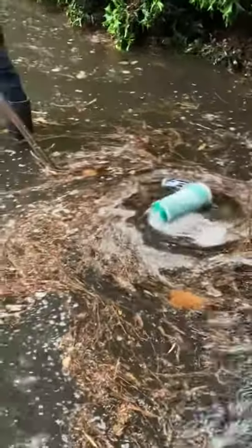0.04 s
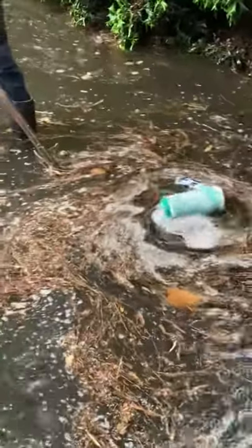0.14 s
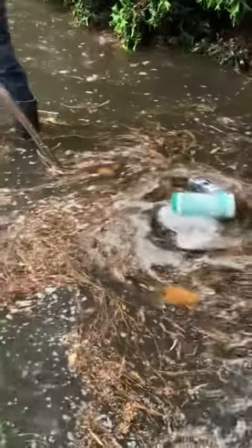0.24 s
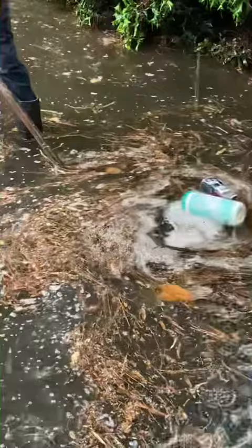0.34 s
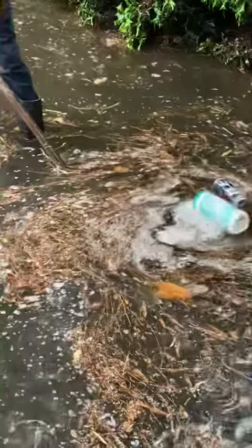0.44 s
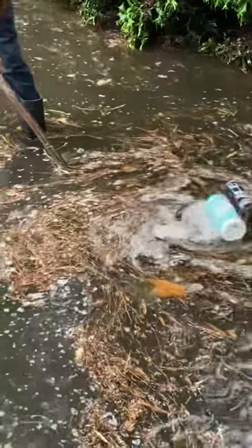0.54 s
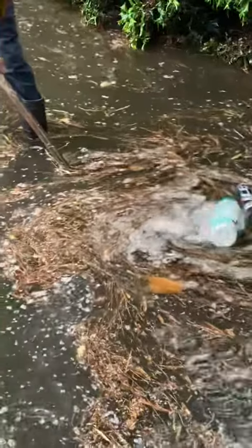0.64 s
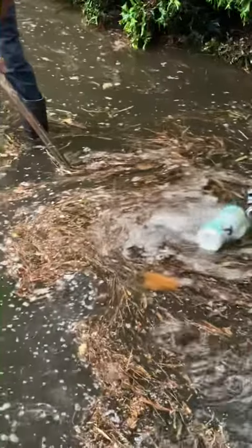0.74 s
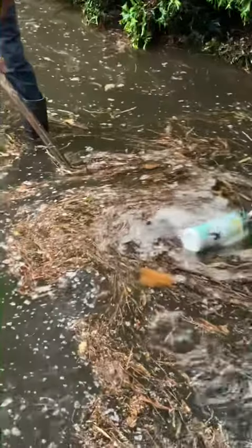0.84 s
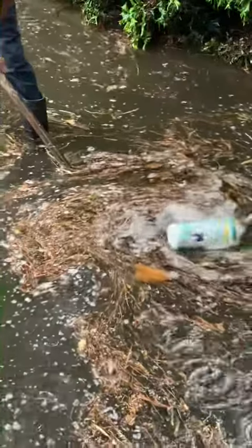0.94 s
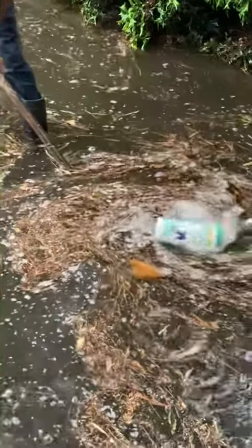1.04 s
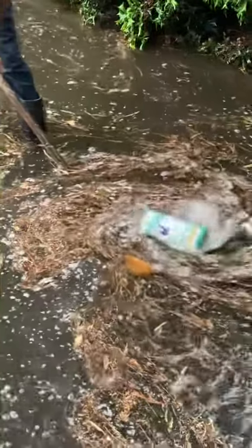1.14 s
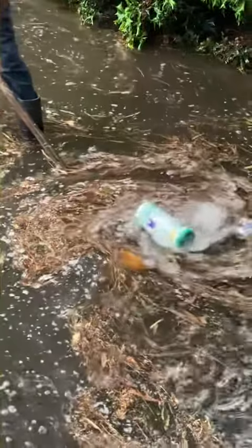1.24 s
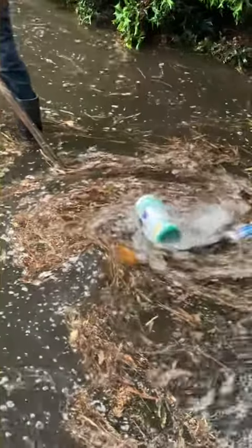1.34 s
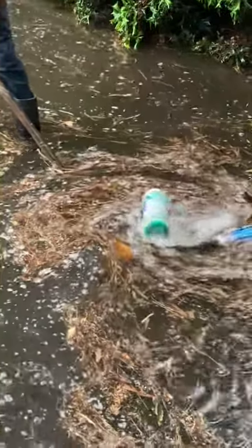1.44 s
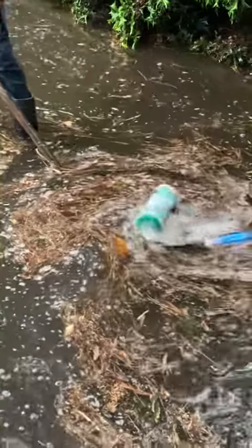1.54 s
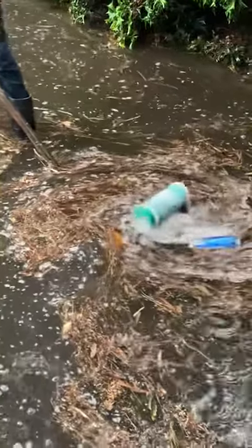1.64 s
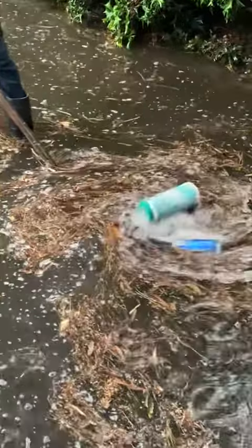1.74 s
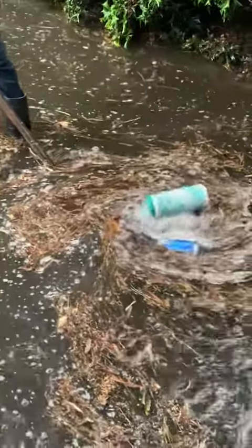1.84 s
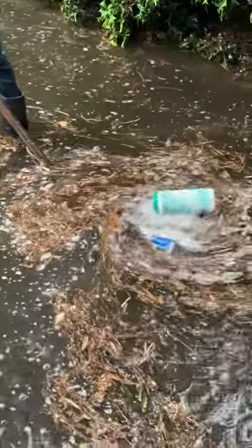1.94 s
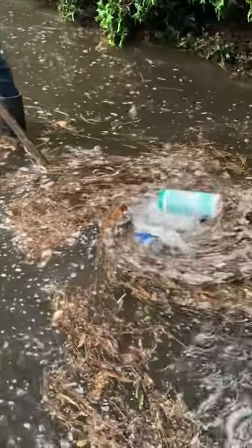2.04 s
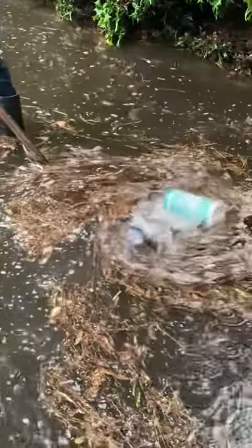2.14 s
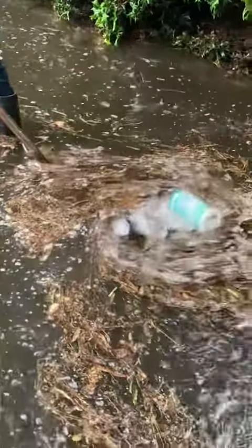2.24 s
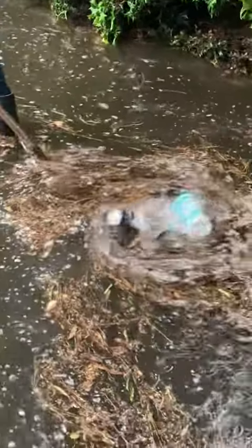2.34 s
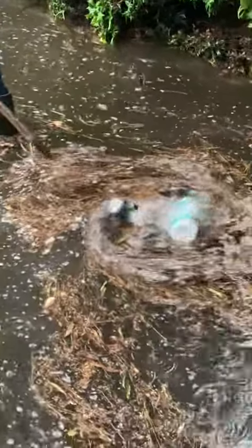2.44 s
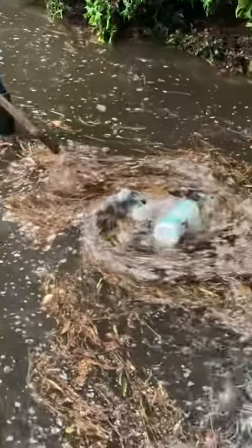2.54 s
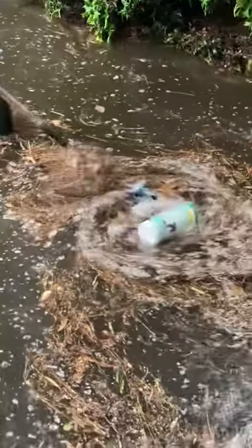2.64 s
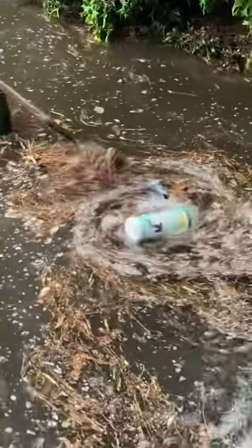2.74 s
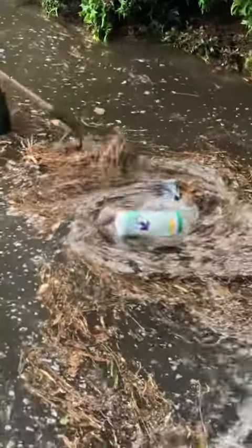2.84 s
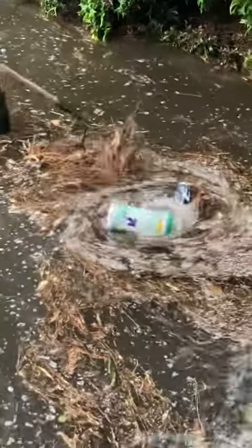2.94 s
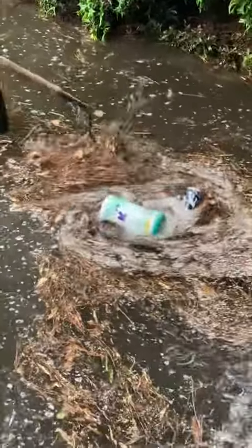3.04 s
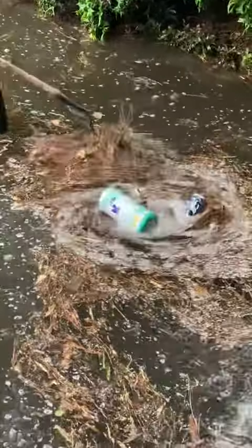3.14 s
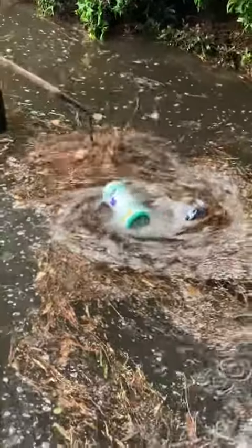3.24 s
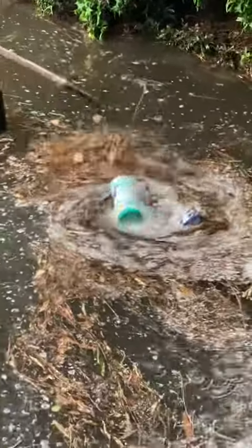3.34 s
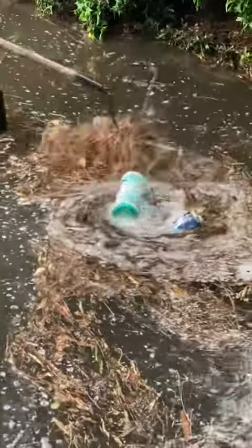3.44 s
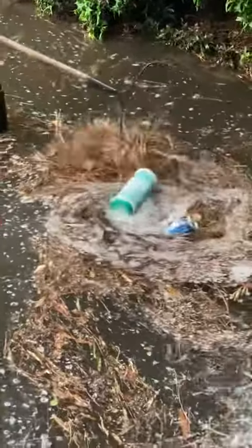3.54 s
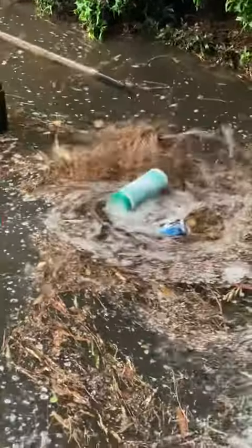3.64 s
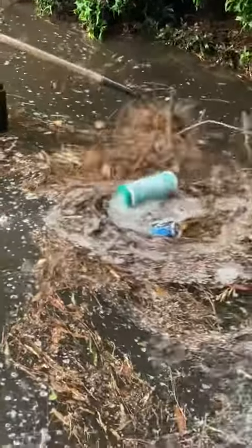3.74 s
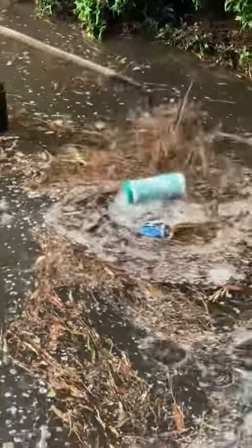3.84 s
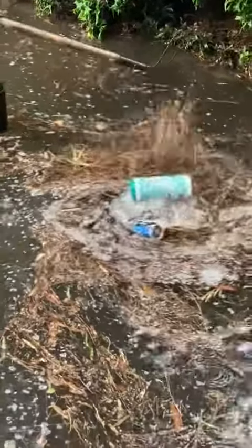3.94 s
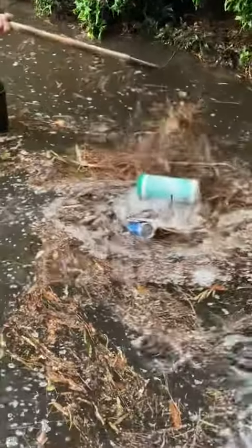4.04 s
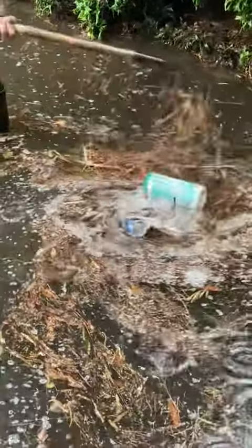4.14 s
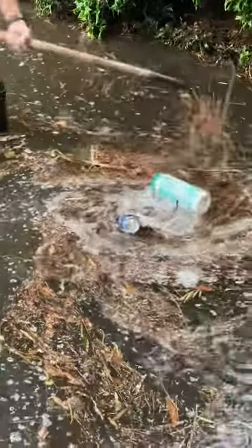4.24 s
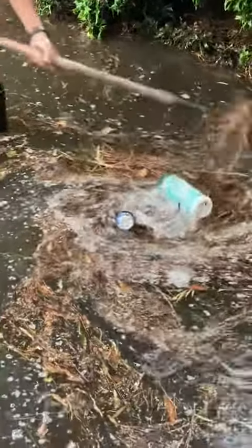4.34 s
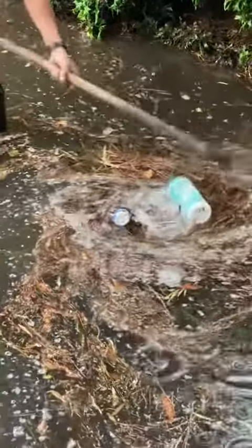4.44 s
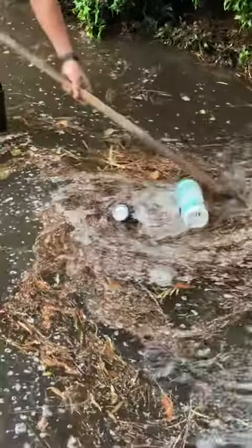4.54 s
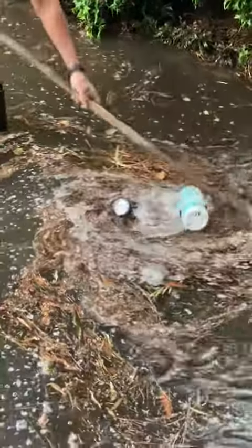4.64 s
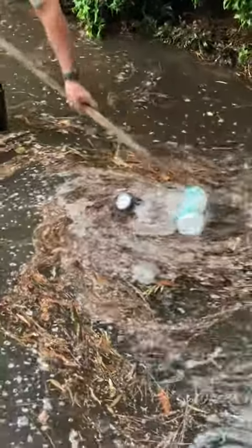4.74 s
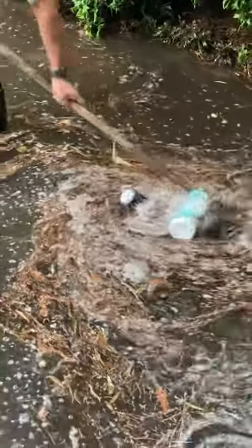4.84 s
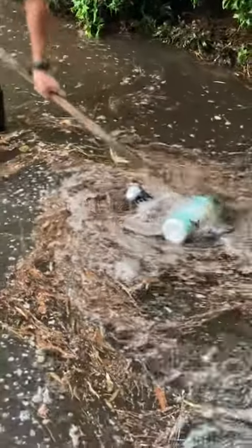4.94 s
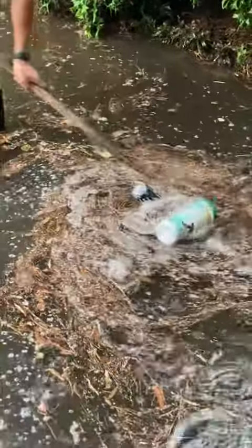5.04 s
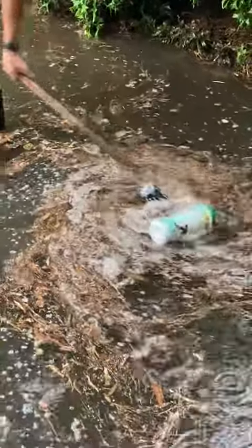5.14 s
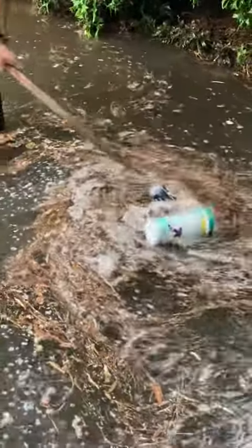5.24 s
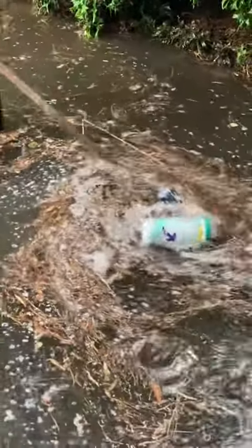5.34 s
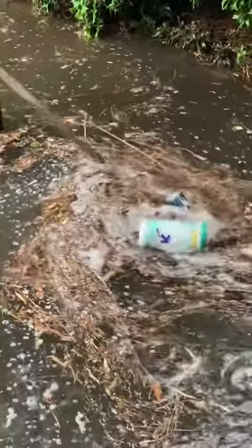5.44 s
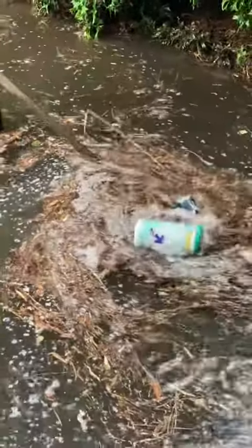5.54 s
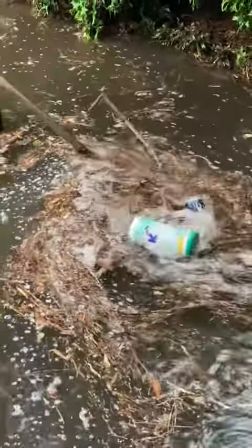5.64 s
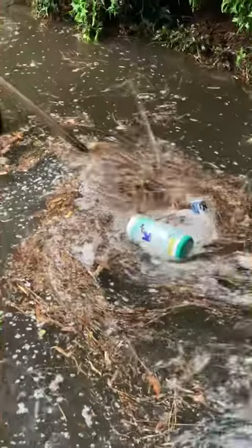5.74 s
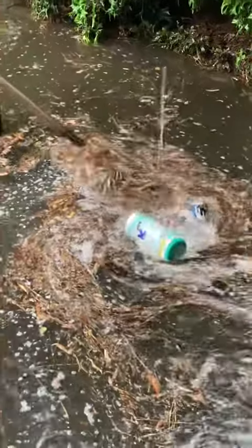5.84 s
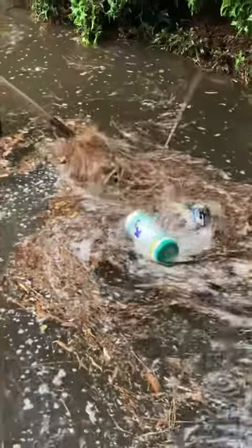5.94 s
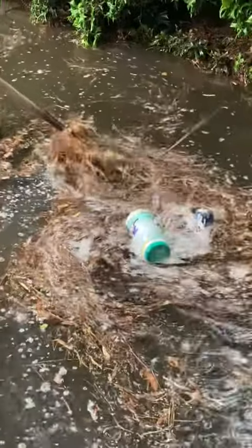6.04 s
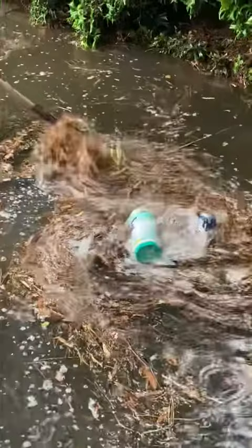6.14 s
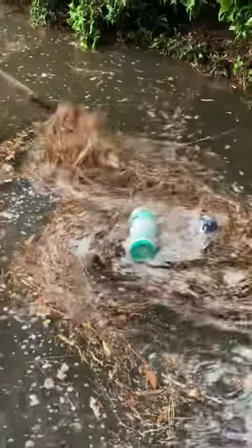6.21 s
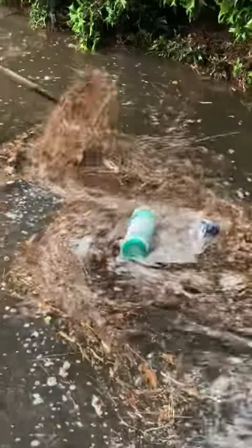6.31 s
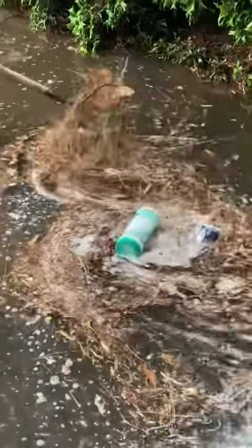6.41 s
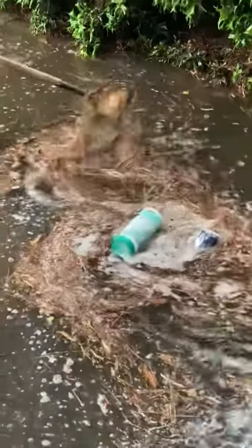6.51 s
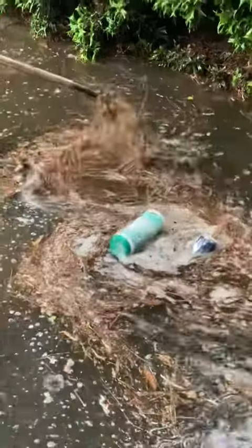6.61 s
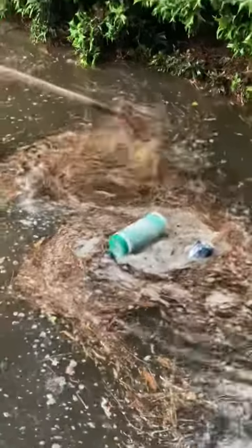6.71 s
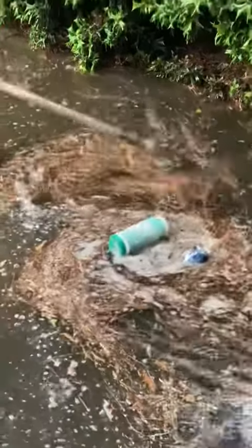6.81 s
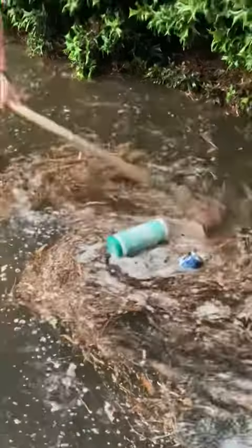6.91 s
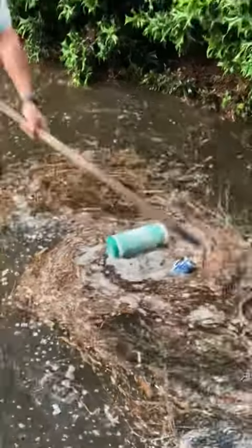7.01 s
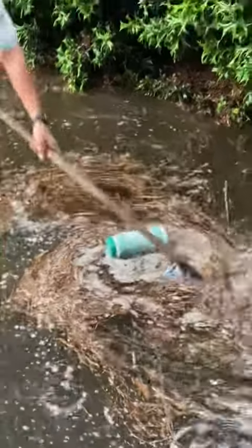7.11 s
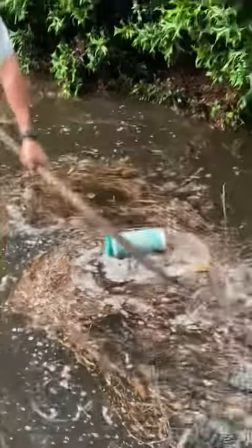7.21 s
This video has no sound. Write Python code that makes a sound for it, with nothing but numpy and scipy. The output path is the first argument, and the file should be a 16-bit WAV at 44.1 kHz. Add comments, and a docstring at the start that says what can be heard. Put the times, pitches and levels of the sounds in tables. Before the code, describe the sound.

Steady swirling drain water with plops and fizz; midway a rake scrapes in a rattling metallic stutter, and near the end strikes with a wet smack.

```python
"""Rake at a flooded street drain

Flood water swirls down a drain: filtered noise makes the rumbling, humming shaft and the hiss of the water sheet.
Drops tick as noise bursts; bubbles plop and fizz as damped sines. A rake sloshes into wet leaves, stutters over
the hard bottom through its own resonances, lets air pockets gulp and slaps down again.
A phone with two microphone ports hears it from close by."""
import sys
import numpy as np
from scipy import signal
from scipy.fft import rfft, irfft, next_fast_len
from scipy.io import wavfile
from scipy.ndimage import uniform_filter1d, map_coordinates

SR = 44100
rng = np.random.default_rng(int(sys.argv[2]) if len(sys.argv) > 2 else 0)


def materialize(psi):
    """Save the field psi as 16-bit PCM at rate SR to the path in sys.argv[1].

    A 1-D psi becomes a single channel; in a 2-D psi each row is a channel.
    """
    bounded = np.clip(np.atleast_2d(psi).T, -1, 1)
    quanta = np.round(bounded * 32767).astype(np.int16)
    wavfile.write(sys.argv[1], SR, quanta)


N = 320607  # samples

# Tone of fine spray: pitch_hz, relative_level_db
SPRAY_TONE = [(3000, -11), (5000, 3), (7000, 1.5), (10000, 2), (13000, 0), (16500, 0)]
# Pushes of the rake through water: crest_s, slosh_db before its layers are mixed, rise_s, fall_s, spray_db
PUSHES = [(4.478, -41, 0.044, 0.13, -43), (4.543, -35, 0.083, 0.028, -49),
          (4.565, -40.5, 0.031, 0.071, -53), (4.67, -49, 0.08, 0.066, -61), (6.40, -46.5, 0.03, 0.055, -58),
          (7.05, -45.5, 0.18, 0.037, -46.5), (7.105, -33, 0.056, 0.036, -62),
          (7.154, -39, 0.024, 0.014, -59), (7.2, -48, 0.12, .15, -51.5), (7.24, -43.5, 0.014, 0.092, -61)]


def amp(db):
    """Decibels to linear gain."""
    return 10 ** (np.asarray(db) / 20)


def unit(x):
    """Scale to an RMS of one."""
    return x / np.sqrt(np.mean(x ** 2) + 1e-20)


def along(points, hz):
    """Read (Hz, value) points on a log frequency axis."""
    f, v = np.transpose(points)
    return np.interp(np.log(hz + 1), np.log(f + 1), v)


def curves(*tables):
    """One level in dB per sample for each column after the time; silent outside the tables."""
    t = np.arange(N) / SR
    each = []
    for table in tables:
        times, *columns = np.transpose(table)
        each.append([np.interp(t, times, column, -200, -200) for column in columns])
    return np.max(each, axis=0)


def wobble(rate):
    """A smooth random curve, rate knots a second."""
    knots = rng.standard_normal(int(N * rate / SR) + 4)
    return map_coordinates(knots, [np.arange(N) * rate / SR])


def filtered(x, response):
    """Shape x by a complex response of frequency."""
    m = next_fast_len(N + SR // 4)
    return irfft(rfft(x, m) * response(np.fft.rfftfreq(m, 1 / SR)), m)[..., :N]


def toned(x, tone):
    """Filter x by (Hz, dB) points."""
    return filtered(x, lambda hz: amp(along(tone, hz)))


def coloured(x, tone):
    """Filter x by (Hz, dB) points, then scale to an RMS of one."""
    return unit(toned(x, tone))


def grainy(rough_db, rate):
    """Noise whose level wanders at random, grain by grain."""
    return unit(rng.standard_normal(N) * amp(rough_db * wobble(rate)))


def bubbles(s, db, hz, t60, rise, size):
    """Damped sines, one a row, whose pitch rises as they die."""
    t = np.arange(size) / SR
    s, db, hz, t60 = (np.asarray(v)[:, None] for v in (s, db, hz, t60))
    decay = amp(db - 60 * t / t60)
    attack = 1 - np.exp(-t * hz * 1.56)
    fade = np.minimum(1, (t[-1] - t) / .002)  # closes the last 2 ms without a click
    tone = np.sin(2 * np.pi * hz * t * (1 + rise * t / t60))
    wave = decay * fade * attack * tone
    at = np.round(s * SR).astype(int) + np.arange(size)
    return np.bincount(at.ravel(), wave.ravel(), N + size)[:N]


def fizz(count, centre_hz, spread, cycles, db, scatter_db, size, rise=.15, start=0):
    """Small bubbles and droplets at random moments: many faint, few loud."""
    u, g = rng.random((count, 2)), rng.standard_normal(count)
    s = start + u[:, 0] * (N / SR - start)
    sizes_db = scatter_db * np.minimum(-np.log(1 - u[:, 1]), 3)
    hz = np.clip(centre_hz * np.exp(spread * g), 300, 16000)
    return bubbles(s, db + sizes_db, hz, cycles / hz, rise, size=size)


def bursts(s, db, t60, carrier=None):
    """Sudden noise, or another carrier, that dies away by 60 dB in t60 seconds, one burst a row."""
    t = np.arange(N) / SR
    power = np.zeros(N)
    for start, level, life in zip(s, db, np.broadcast_to(t60, len(s))):
        decay_db = 60 * np.clip(t - start, 0, 1) / max(life, 1e-4)
        power += amp(level - decay_db) ** 2 * (t >= start)
    return np.sqrt(power) * (rng.standard_normal(N) if carrier is None else carrier)


def swells(s, db, rise, fall, depth_db):
    """Level that climbs to each crest and sinks again, straight in dB: depth_db in each rise or fall time."""
    t = np.arange(N) / SR
    power = np.zeros(N)
    for crest, level, r, f in zip(s, db, rise, fall):
        away = np.maximum((crest - t) / max(r, .003), (t - crest) / max(f, .003))
        power += amp(level - depth_db * away) ** 2
    return np.sqrt(power)


def rake():
    """The head churns water into bubbles and droplets, which the slosh, the scrape and the slap share."""
    start = PUSHES[0][0] - .2
    froth = unit(fizz(count=3600, centre_hz=1154, spread=0.458, cycles=27, db=0, scatter_db=2.5,
                      size=1000, start=start))
    droplets = unit(fizz(count=1500, centre_hz=3007, spread=0.363, cycles=36, db=0, scatter_db=2.5,
                         size=500, start=start))
    return slosh(froth, droplets) + scrape(froth, droplets) + gulps() + slap(froth, droplets)


def slosh(froth, droplets):
    """Pushed water swells and sinks as churning noise, froth and droplets under a spray."""
    # Tone of churned water: pitch_hz, relative_level_db
    churn_tone = [(200, 1), (350, 6.5), (500, -7), (800, 0.5), (1500, -0.5), (2500, -0.5), (4000, -11),
                  (6500, -16), (9000, -48)]
    s, db, rise, fall, spray_db = np.transpose(PUSHES)
    churn = coloured(grainy(rough_db=0.5, rate=210), churn_tone)
    body = 1.04 * churn + 0.61 * froth + 0.33 * droplets
    water = swells(s, db, rise, fall, depth_db=17) * amp(1.9 * wobble(120)) * body
    spray = coloured(grainy(rough_db=3.5, rate=400), SPRAY_TONE)
    return water + swells(s, spray_db, rise, fall, depth_db=8) * spray


def scrape(froth, droplets):
    """Tines drag, catch and slip on the hard bottom; each catch rings the rake's resonances anew."""
    # Two drags over the bottom: time_s, scrape_db, grit_db (both before the mix gains below)
    drags = [
        [(4.712, -28.5, -58), (4.717, -26, -48.5), (4.77, -33.5, -49.5), (4.825, -31, -49.5), (4.84, -27, -42),
         (4.88, -29, -44.5), (4.895, -33, -56), (4.92, -27.5, -42), (4.95, -31, -44), (4.962, -31.5, -45),
         (4.997, -32.5, -51), (5.012, -28.5, -43), (5.033, -28.5, -40.5), (5.045, -36, -53.5),
         (5.42, -54.5, -61.5)],
        [(7.232, -48, -49), (7.25, -37, -58), (7.27, -23, -40)],
    ]
    # Tines catch and slip: start_s, base_level_db, ring_hz
    jolts = [(4.715, -25, 1120), (4.726, -19, 930), (4.751, -24.5, 1240), (4.8, -20, 815),
             (4.836, -20, 1240), (4.847, -21, 900), (4.856, -18, 770), (4.873, -22, 1700),
             (4.917, -15, 1050), (4.929, -15, 920), (4.94, -16, 1060), (4.969, -19, 935), (4.986, -17, 963),
             (5.008, -20.5, 1210), (5.076, -27, 810), (5.095, -23, 900), (5.134, -30.5, 1230),
             (5.152, -26, 950), (5.18, -26, 963), (5.21, -30, 960), (5.226, -27.5, 1500), (5.245, -33, 980),
             (5.262, -34, 1120), (5.284, -26, 970), (5.33, -30, 1600), (5.349, -26.5, 980),
             (5.378, -35, 990)]
    # Resonances of the rake: pitch_hz, width_hz, relative_level_db
    resonances = [(573, 320, -4), (780, 44, 7), (966, 30, 9.5), (1016, 82, -3), (1243, 96, 3),
                  (1440, 110, -5), (1727, 165, 1)]
    catch_s, catch_db = 0.011, 8.5  # time to fall 60 dB, level over the jolt's base
    ring_s, ring_db = 0.034, -2.5
    dull_hz = 2020  # the stutter dies steeply above this

    def modes(f):
        total = 0
        for k, (centre, width, db) in enumerate(resonances):
            resonance = 1j * f * width / (centre ** 2 - f ** 2 + 1j * f * width)
            total = total + (-1) ** k * amp(db) * resonance  # neighbours in opposite sign
        return total

    level_db, grit_db = curves(*drags)
    slips = unit(grainy(rough_db=0.5, rate=400) * amp(2.5 * wobble(110)))  # by grains and in lumps
    scale = np.std(filtered(slips, modes))
    s, db, hz = np.transpose(jolts)
    catches = bursts(s, db + catch_db, catch_s)
    stutter = filtered(0.76 * amp(level_db) * slips / scale + catches, modes)
    # each catch also leaves one short ring
    stutter += bubbles(s, db + ring_db, hz, np.full(len(s), ring_s), rise=0.0091, size=1800)
    grit_tone = [(1500, -33), (2500, 9.5), (3200, 0), (4100, -5), (6000, -5.0), (9000, -15.5)]  # (Hz, dB)
    grit = amp(grit_db) * (coloured(grainy(rough_db=2.5, rate=500), grit_tone) + 0.66 * droplets)
    stutter += amp(level_db - 7) * froth  # the drag stirs up bubbles too
    return filtered(stutter, lambda hz: 1 / (1 + (hz / dull_hz) ** 9)) + grit


def gulps():
    """Each air pocket sounds one wavering tone that slides as it empties; the singing tine wavers the same way."""
    # Air pockets under the leaves: start_s, length_s, first_hz, last_hz, level_db
    pockets = [(4.46, .065, 961, 774, -40.5), (4.522, 0.017, 430, 384, -33.5),
               (4.772, 0.064, 365.6, 366.6, -28.5), (4.835, 0.068, 361, 410, -32.5),
               (4.918, 0.036, 430, 406, -28.5), (4.985, 0.06, 416, 447, -36.5),
               (5.017, 0.019, 895, 926, -21.5), (7.09, 0.029, 445, 550, -33),
               (7.136, 0.032, 410, 405, -33.5), (7.237, 0.037, 437, 529, -29.5),
               (7.247, 0.031, 627, 900, -29)]
    # One tine sings: start_s, length_s, first_hz, last_hz, level_db
    tine = (5.045, .04, 3690, 3710, -51)
    edge_s = 0.0055  # fade at both ends
    t, out = np.arange(N) / SR, np.zeros(N)
    waver_hz = 5.0 * wobble(70)
    flutter = amp(1.2 * wobble(60) + 1.5 * wobble(200))
    for s, length, first, last, db in [*pockets, tine]:
        at = (t >= s) & (t < s + length)
        u = t[at] - s
        shape = np.clip(np.minimum(u, length - u) / edge_s, 0, 1) ** 2
        hz = first + (last - first) * u / length + waver_hz[at]
        out[at] += amp(db) * shape * flutter[at] * np.sin(2 * np.pi * np.cumsum(hz) / SR)
    return out


def slap(froth, droplets):
    """The head strikes: a short crack in a longer burst of noise, and a splash that breaks into drops."""
    # Strikes of the head: start_s, base_level_db
    strikes = [(7.066, -34), (7.073, -35), (7.0828, -10.5), (7.09, -12), (7.098, -21), (7.105, -25),
               (7.123, -29), (7.148, -43), (7.156, -36), (7.234, -36)]
    # Tone of a strike: pitch_hz, gain_db
    slap_tone = [(200, -27), (450, -7), (1400, -1), (2300, 2.5), (3000, -9), (3700, -5), (5500, -8.5),
                 (7500, -6.5), (10000, -9.5), (16000, -19)]
    slap_s, crack_s = 0.046, 0.0052  # time to fall 60 dB
    s, db = np.transpose(strikes)
    body = amp(2.7 * wobble(250)) * bursts(s, db, slap_s)
    crack = bursts(s, db + 3, crack_s)
    splash = bursts(s, db - 13.5, 1.04 * slap_s, carrier=droplets + 0.5 * froth)
    return toned(body + crack, slap_tone) + splash


def drops():
    """Single plops, plinks and ticks over a bed of fizz; one bubble whistles upward."""
    # Drips: start_s, level_db, pitch_hz
    drips = [(0.1922, -27, 3560), (1.49, -28, 5110), (1.707, -31, 1280), (1.7558, -30.5, 3130),
             (1.7643, -29, 4960), (1.801, -30.5, 1940), (2.0273, -26, 3950), (2.2438, -34, 1940),
             (3.6587, -29.5, 4720), (4.418, -28, 5160), (4.5644, -24, 624), (4.6039, -27, 1610),
             (4.627, -30.5, 930), (4.6718, -31, 1800), (4.921, -24, 4900), (5.537, -27.5, 5400),
             (5.71, -31, 2900), (6.195, -23, 2540), (6.266, -26, 3870), (6.387, -31, 2500),
             (6.417, -37, 1850), (6.589, -28.5, 1800), (6.7064, -22, 4980), (7.04, -19.5, 950),
             (7.073, -22, 1850), (7.235, -25, 2260)]
    # Trapped bubbles that ring on: start_s, level_db, pitch_hz
    trapped = [(0.2134, -35, 1700), (0.5707, -37, 3000), (0.899, -42, 1040), (1.267, -32.5, 1030),
               (1.9645, -33.5, 3030), (2.259, -37, 2740), (3.2898, -26, 3260), (4.958, -31, 3870),
               (6.4117, -32, 2700), (6.633, -34.5, 3250)]
    # Drops on the surface: start_s, snap_db, splat_db relative to the snap (both before filtering)
    hits = [(0.1904, -34, 3.5), (1.0902, -32.5, -15), (1.3785, -34, -12), (2.1735, -33.5, -9),
            (2.6892, -33.5, -6), (3.0294, -31.5, -11), (3.181, -35, -7), (3.6322, -33.5, -17),
            (3.8188, -25.5, -29), (4.0672, -37, -8), (4.167, -33, -18), (4.446, -31, -7),
            (4.5206, -23.5, -21), (4.87, -31, -11), (5.6485, -36, -7), (5.965, -29, -7), (6.704, -32, -12),
            (6.8484, -34, -6), (6.9804, -27, -10)]
    plop_cycles, plink_cycles = 16.7, 33.5  # cycles to fall 60 dB
    snap_s, spatter_s, splat_s = 0.0085, 0.079, 0.014  # time to fall 60 dB
    spatter_db = -12.5  # relative to the snap
    s, db, hz = np.transpose(drips)
    plops = bubbles(s, db, hz, plop_cycles / hz, rise=0.1, size=1800)
    s, db, hz = np.transpose(trapped)
    plinks = bubbles(s, db, hz, plink_cycles / hz, rise=0.04, size=1800)
    whistle = bubbles([2.095], [-46], [850], [.3], rise=3.6, size=1900)
    s, db, splat_db = np.transpose(hits)
    snaps = bursts(s, db, snap_s) + bursts(s, db + spatter_db, spatter_s)
    ticks = filtered(snaps, lambda hz: 1 / (1 + (6000 / (hz + 1)) ** 4))  # treble only
    splat_tone = [(1500, -30), (2500, 5.0), (5500, 5.0), (8000, -6)]  # (Hz, dB)
    ticks += toned(bursts(s, db + splat_db, splat_s), splat_tone)
    beads = fizz(count=400, centre_hz=5010, spread=0.344, cycles=34.5, db=-57, scatter_db=7.0, size=500)
    low = fizz(count=900, centre_hz=2550, spread=0.54, cycles=10.0, db=-60.0, scatter_db=2.0, size=900)
    high = fizz(count=900, centre_hz=7570, spread=0.56, cycles=6.1, db=-42.5, scatter_db=4.0, size=200)
    return plops + plinks + whistle + ticks + beads + low + high


def drain():
    """Falling water booms in the shaft, whose air column hums; the surface rushes and sprays."""
    # Course of the flow: time_s, hum_db of the shaft, spray_db before its surges
    flow = [(0, -63, -54.5), (1, -59, -55), (2.4, -51, -54), (3.8, -52, -52), (4.6, -47.5, -55.5),
            (5.8, -37.5, -53.5), (6.5, -44, -50), (7.27, -37, -58)]
    # Tone of the boom: pitch_hz, relative_level_db
    rumble_tone = [(13, -33), (22, -40), (36, -9.5), (64, 0), (81, -2), (98, -8.5), (173, -13),
                   (203, -18.5), (296, -21.5), (500, -46.5), (650, -69), (1100, -120)]
    # Tone of the rushing surface: pitch_hz, relative_level_db
    rush_tone = [(150, -4.5), (350, -0.5), (700, -3), (1000, -5.5), (1700, -8), (2800, -10.5), (4100, -16),
                 (5200, -17.5), (7000, -17.5), (9000, -120)]
    hum_hz, hum_width_hz = 53.8, 6.8
    rumble_db, rush_db = -38.5, -48  # mean levels, before the slow wobbles
    hum_db, spray_db = curves(flow)
    rumble = amp(rumble_db + 0.43 * wobble(5.5)) * coloured(rng.standard_normal(N), rumble_tone)
    column = lambda hz: 1 / (1 + ((hz - hum_hz) / hum_width_hz) ** 2)
    hum = amp(hum_db) * unit(filtered(rng.standard_normal(N), column))
    surge_db = 0.65 * wobble(6.3)  # shared by rush and spray
    rush = amp(rush_db + surge_db) * patchy(rush_tone, patchy_db=1.73)
    spray_level = amp(spray_db + surge_db + 2.05 * wobble(25))
    spray = spray_level * coloured(grainy(rough_db=2.5, rate=700), SPRAY_TONE)
    return rumble + hum + rush + spray


def patchy(tone, patchy_db):
    """Far noise, partly alike at both ports, with patches of random gain in time and pitch."""
    # Likeness of far sound at both ports: pitch_hz, likeness (0 to 1)
    alike = [(250, 0.94), (400, 0.61), (700, 0.27), (1100, 0.15), (1500, 0.051), (2000, 1), (2500, 0.94),
             (3200, 1), (4300, 0.92), (6000, 0.99)]
    z = signal.stft(rng.standard_normal((2, N)), nperseg=256)[2]
    field = uniform_filter1d(rng.standard_normal(z.shape[1:]), size=5, axis=0)
    field = uniform_filter1d(field, size=8, axis=1)
    pair = signal.istft(z * amp(patchy_db * unit(field)), nperseg=256)[1][:, :N]

    def split(hz):
        turn = np.arccos(np.clip(along(alike, hz), 0, 1)) / 2  # shares power between mid and side
        return amp(along(tone, hz)) * [np.cos(turn), np.sin(turn)]

    mid, side = filtered(pair, split)
    return unit(np.array([mid + side, mid - side]))


def kerb(x, t60):
    """Close scattering off the kerb and hedge, a short noise tail, reaches the two ports in opposite sign."""
    t = np.arange(SR // 20) / SR
    tail = rng.standard_normal(len(t)) * amp(-60 * t / t60)
    wet = signal.fftconvolve(x, tail / np.linalg.norm(tail))[:N]
    kerb_tone = [(60, -60), (150, -28), (500, 2.5), (1500, 0.0), (2400, -18), (4000, -1.0), (9000, -1)]  # (Hz, dB)
    return toned(wet, kerb_tone) * [[1], [-1]]


def scene():
    """Rake and drops close by, their scattering off the kerb, and the drain."""
    near = rake() + drops()
    return drain() + near + amp(-15.5) * kerb(near, t60=0.026)


def record(dry):
    """The ports differ in mid level and treble phase; deep bass is cut; the top drops, fades, then ends."""
    # Phase between the ports: pitch_hz, left_lead_radians
    lead = [(5000, 0), (5500, .45), (6700, 3.14), (7700, 3.14), (8900, 4.9), (9900, 6.28), (11200, 6.28),
            (12800, 9.42), (14000, 9.42), (16500, 12.3)]
    # Level between the ports: pitch_hz, left_minus_right_db
    lean = [(300, 0), (420, -.4), (700, 1.6), (1300, 2.8), (2400, 0)]
    edge_hz, top_hz, bass_cut_hz = 15800, 16600, 36
    port = np.array([[.5], [-.5]])  # left and right take half the difference each

    def ports(hz):
        return amp(port * along(lean, hz)) * np.exp(1j * port * along(lead, hz))

    def limits(hz):
        top_db = -14 * (hz > edge_hz) - 0.014 * np.clip(hz - edge_hz, 0, None)
        return amp(top_db) * (hz < top_hz) / (1 + (bass_cut_hz / (hz + 1)) ** 6)

    return filtered(filtered(dry, ports), limits)


dry = scene()
out = record(dry)
materialize(out)
```